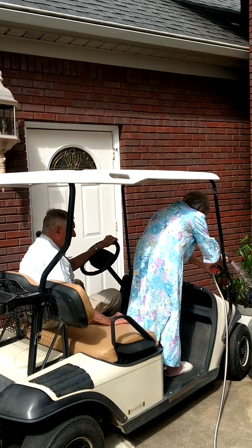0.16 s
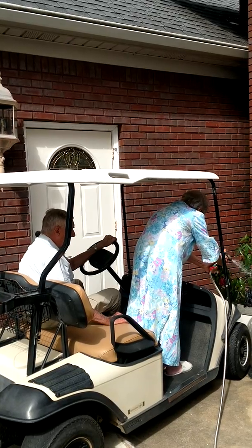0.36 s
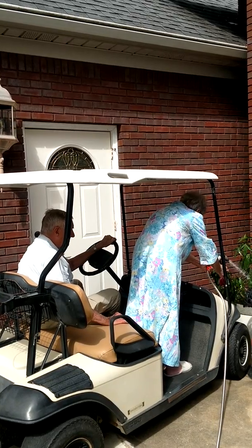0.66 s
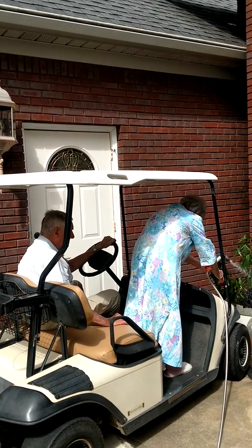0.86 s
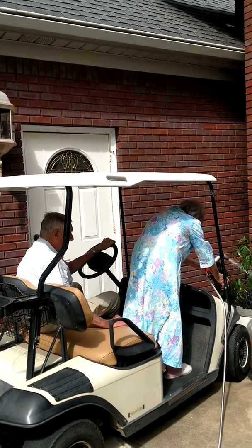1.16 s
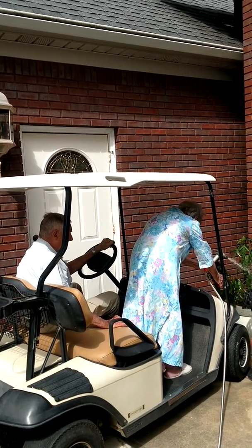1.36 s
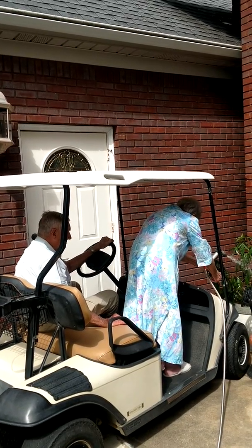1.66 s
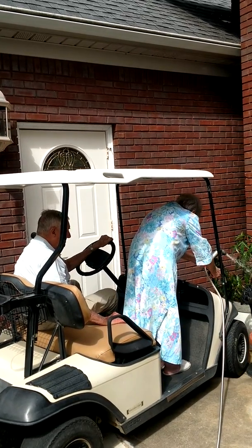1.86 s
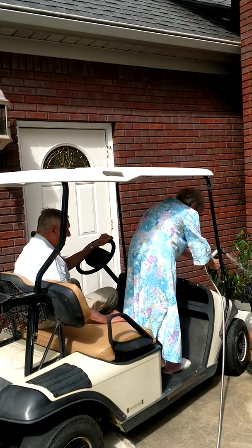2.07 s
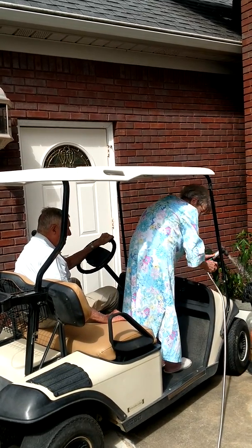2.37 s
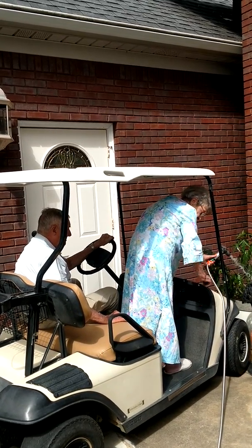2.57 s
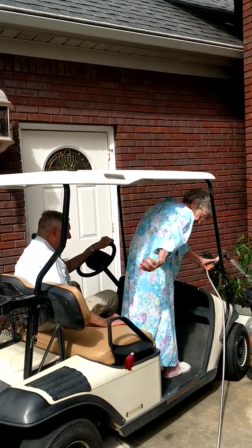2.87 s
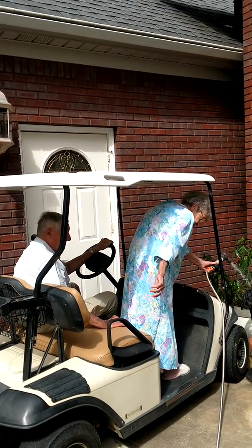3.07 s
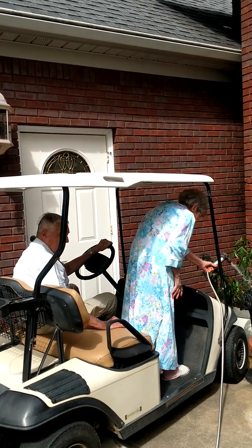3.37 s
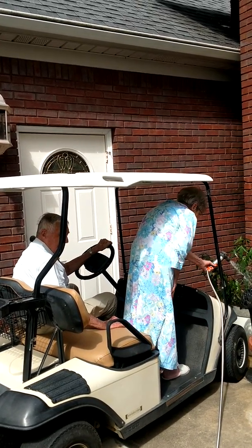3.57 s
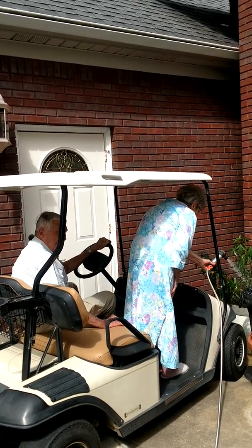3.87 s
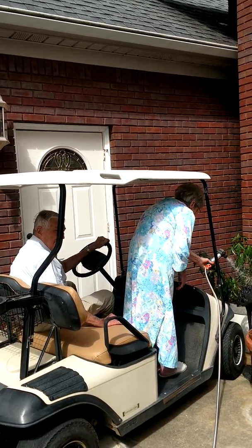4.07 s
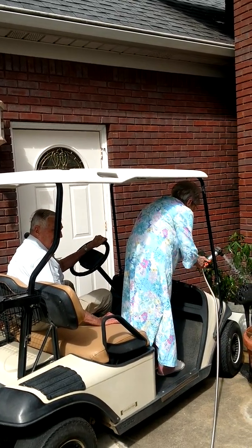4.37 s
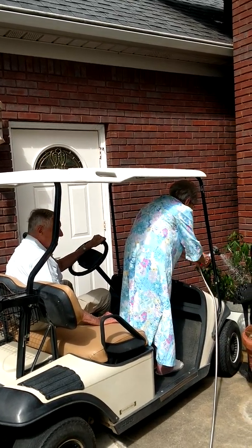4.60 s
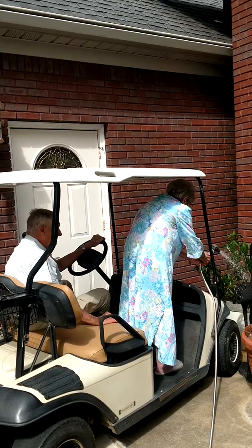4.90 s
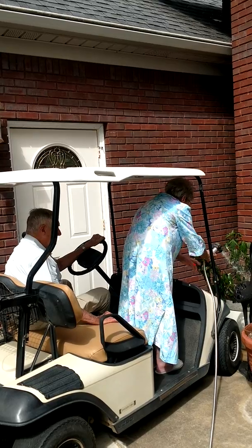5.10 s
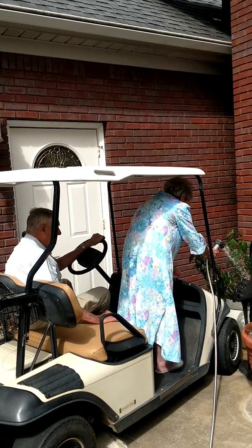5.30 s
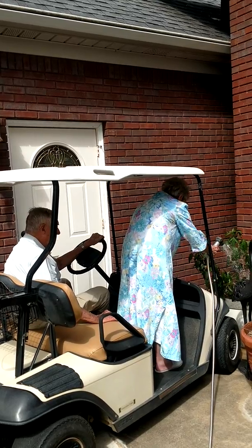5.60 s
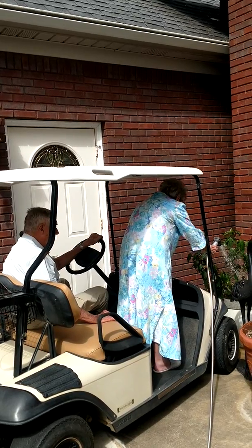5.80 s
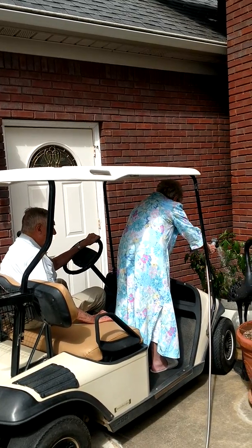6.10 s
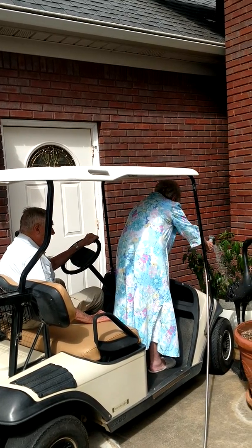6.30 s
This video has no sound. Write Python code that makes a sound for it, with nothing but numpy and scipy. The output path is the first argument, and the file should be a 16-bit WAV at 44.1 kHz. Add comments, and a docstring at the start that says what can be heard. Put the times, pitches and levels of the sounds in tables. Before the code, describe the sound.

A garden hose sprays water onto potted shrubs outdoors for about six and a half seconds, a few metres away and slightly to the right. The nozzle makes a steady, high, grainy hiss, with softer pattering on leaves and splashing in clay pots. A heavy drop slaps a leaf at 0.3 seconds. From 0.4 to 0.8 seconds, wind buffets the left side of the microphone with a cluster of low thumps, then eases. The spray sputters on the leaves in small spurts between 1.5 and 2.2 seconds, and again around 2.8, 4 and 4.9 seconds. Wind thumps return from 4 to 4.6 seconds and from about 5.2 to 5.9. Around 5.7 to 6.1 seconds, the splashing grows fuller and drops ring hollowly inside a deep pot. The hiss continues to the end, with a faint distant rumble beneath it throughout.

```python
"""Hose on potted shrubs in a breeze.

A nozzle a few metres to the right hisses and sputters; drops spatter on leaves and splash into
ringing clay pots. A fitful breeze buffets the left port of a phone, over a distant outdoor rumble.
The phone's stereo stage subtracts a delayed copy of each port from the other."""
import sys
import numpy as np
from scipy import signal
from scipy.fft import rfft, irfft
from scipy.io import wavfile
from scipy.ndimage import uniform_filter1d

SR = 44100
rng = np.random.default_rng(int(sys.argv[2]) if len(sys.argv) > 2 else 0)


def dump_mix(stems):
    """Bounce the given channels to the path in sys.argv[1] as a 16-bit WAV at rate SR."""
    frames = np.atleast_2d(stems).T  # one column per channel
    limited = np.clip(frames, -1, 1)  # hard clip at full scale
    pcm = np.round(limited * 32767).astype(np.int16)
    wavfile.write(sys.argv[1], SR, pcm)


N = 284445
BINS_HZ = np.maximum(np.arange(N // 2 + 1) * SR / N, 1)


def spray():
    """A hand-held nozzle sweeps leaves and pots; air in the hose makes jet and impacts sputter together."""
    # nozzle sweep: time_s, jet_db, leaf_db, pot_db
    sweep = [(0.0, -32, -39.5, -47.5), (0.2, -31, -45, -47), (0.5, -32, -40.5, -45),
             (0.68, -30.5, -44, -46), (1.1, -31.5, -44, -47), (1.45, -30.5, -49, -46),
             (1.55, -31.5, -48, -49.5), (1.66, -28.5, -47.5, -46), (1.72, -31, -45.5, -52),
             (1.86, -30, -51, -49), (1.91, -32, -50, -49.5), (2.0, -29, -48, -47.5),
             (2.05, -32, -52, -43.5), (2.18, -31, -42.5, -44), (2.25, -31.5, -41.5, -47),
             (2.35, -30.5, -41.5, -45.5), (2.6, -31, -43.5, -47.5), (2.83, -33, -39.5, -46),
             (2.9, -31.5, -41, -46), (3.15, -30.5, -40, -47), (3.45, -31, -41, -45), (3.58, -31, -41, -48),
             (3.73, -30.5, -39.5, -44), (4.0, -32, -44.5, -46.5), (4.3, -32, -41, -45),
             (4.95, -30.5, -43.5, -43.5), (5.01, -32.5, -43, -40), (5.08, -32, -50, -45),
             (5.15, -29.5, -46.5, -41), (5.27, -30.5, -41.5, -44.5), (5.35, -31, -42.5, -43),
             (5.47, -32, -39, -44.5), (5.53, -30, -45, -41), (5.6, -31, -43, -44.5),
             (5.67, -30, -44.5, -43), (5.77, -30, -41, -41.5), (5.85, -33, -40.5, -43.5),
             (5.92, -31.5, -44, -39), (6.02, -30, -38.5, -40), (6.13, -31, -39, -47),
             (6.45, -30.5, -38.5, -44)]
    # spurts hitting the leaves: start_s, lift_db
    spurts = [(1.454, 7.5), (1.539, 7), (1.617, 5.5), (1.854, 7.5), (2.003, 3), (2.167, 3.5), (2.819, 6.5),
              (2.989, 3), (4.005, 5.5), (4.218, 4.5), (4.781, 4.5), (4.9, 4.5), (4.968, 3), (6.285, 4.5)]
    # shading by the phone's body: freq_hz, left_minus_right_db
    body_shade = [(500, -2.5), (1100, -3), (1600, -6), (2800, -3.5), (6500, -3.5), (8600, -5), (9700, -6),
                  (10800, -5.2), (12000, -8.3), (14000, -9), (15200, -5)]
    hand_wander_db = (0.2, 0.5, 0.11)  # jet, leaf, pot
    jet_db, leaf_db, pot_db = (c + db * walk(22.125) for c, db in zip(curves(sweep), hand_wander_db))
    sputter = 0.8 * walk(60) + 0.6 * walk(130)
    sputter -= uniform_filter1d(sputter, SR // 14)
    t, fade_s = np.arange(N) / SR, 0.014
    spurt_db = sum(db * (t >= s) * np.exp(-np.abs(t - s) / fade_s) for s, db in spurts)
    shade = spectrum(body_shade)
    return (jet_hiss(jet_db + 0.33 * spurt_db, sputter, shade)
            + leaf_spatter(leaf_db + spurt_db, sputter, shade)
            + pot_splash(pot_db, sputter, shade))


def jet_hiss(level_db, sputter, shade):
    """Water leaves the nozzle with a high, grainy hiss."""
    # jet spectrum: freq_hz, density_db
    colour = [(5000, -16.5), (6200, -12.5), (7500, -8.5), (8600, -1), (9700, -1.5), (10800, -2),
              (12000, 0.5), (12900, 0.5), (14000, -2.5), (15200, -4.5)]
    jet = banded_noise(colour, drops(per_s=6000, share=0.39), shade, likeness=0.032, lag_s=7e-5,
                       common_db=0.45 * sputter, flicker_db=0.56)
    return undb(level_db) * jet


def leaf_spatter(level_db, sputter, shade):
    """Drops patter on leaves; the treble slowly rises and falls."""
    # spatter spectrum: freq_hz, density_db
    colour = [(1500, -4.5), (2200, 1.5), (2800, -3.5), (3400, -1.95), (3900, -1.5), (4600, -6.5),
              (5300, -4.5), (6500, -6.5), (7600, -2), (8600, -59)]
    # shelf above treble_hz: time_s, gain_db
    shelf = [(0.0, -2.5), (0.9, 3.2), (1.8, 6.5), (2.3, 1.3), (3.4, 0.1), (4.2, -0.5), (5.0, 2.5),
             (5.8, -2), (6.45, -1.6)]
    treble_hz = 4400
    spatter = banded_noise(colour, drops(per_s=2500, share=0.18), shade, likeness=0.3, lag_s=5e-5,
                           common_db=0.37 * sputter, flicker_db=0.81)
    treble = filtered(spatter, 1 / (1 + (treble_hz / BINS_HZ) ** 6))
    return undb(level_db) * (spatter + treble * (undb(curves(shelf)[0]) - 1))


def pot_splash(level_db, sputter, shade):
    """Water splashes into the pots; a fuller splash sounds deeper."""
    # splash spectrum: freq_hz, density_db
    colour = [(350, -7.5), (500, -9), (650, -1.7), (860, 1.5), (1100, -3), (1400, -1.5), (2000, -4),
              (2600, -9.5)]
    splash = banded_noise(colour, drops(per_s=900, share=0.23), shade, likeness=0.68, lag_s=1.1e-4,
                          common_db=0.3 * sputter, flicker_db=0.98)
    splash = pot_resonance(splash)
    bass_db = 0.32 * (level_db - np.mean(level_db))
    return undb(level_db) * (splash + lowpass(splash, cutoff_hz=613) * (undb(bass_db) - 1))


def pot_resonance(x):
    """Hollow clay pots lift narrow bands of the noise that excites them."""
    # pot modes: freq_hz, width_hz, lift_db
    modes = [(235.3, 8.1, 10), (295.5, 6.6, 9.5), (404, 7.3, 3), (554, 31, 4), (1090, 28, 1),
             (1240, 15, 1.5)]
    return filtered(x, 1 + sum((undb(db) - 1) * resonance(hz, width) for hz, width, db in modes))


def leaf_slaps():
    """Heavy drops hit a leaf with a ragged splat."""
    # slaps: time_s, level_db, pitch_hz, length_ms
    slaps = [(.040, -37, 2100, 5.0), (.300, -31, 1750, 2.8), (.313, -42, 1250, 3.0), (5.531, -40, 830, 9)]
    return wavelets(slaps, glide=0.11, rise=3.0) * (1 + 0.2 * walk(900)) * port_gains(-3, 0)


def deep_pot():
    """Drops falling inside a deep pot ring its hollow."""
    # hollow's modes: freq_hz, width_hz, gain_db
    modes = [(543, 70, -2.5), (655, 48, -0.5), (1100, 36, 0), (1270, 28, 2)]
    # ring as the jet falls inside: time_s, level_db
    inside = [(0.0, -63.5), (4.9, -62), (5.15, -55.5), (5.4, -60), (5.7, -50), (5.78, -51), (5.85, -50),
              (5.93, -42), (6.03, -42), (6.12, -56), (6.45, -60)]
    hollow = sum(undb(db) * resonance(hz, width) for hz, width, db in modes)
    ring = unit_rms(filtered(drops(per_s=300, share=0.52)[0], hollow))
    return ring * undb(curves(inside)[0] + 2.44 * walk(20)) * port_gains(-3, 0)


def wind():
    """Eddies rumble and buffet on the left port; the right is sheltered."""
    # breeze strength: time_s, level_db
    gusts = [(0.0, -26.5), (0.14, -53), (0.3, -46), (0.37, -37), (0.41, -36), (0.55, -31), (0.66, -35.5),
             (0.8, -44.5), (0.9, -60), (1.15, -52), (1.55, -62), (1.85, -73), (2.25, -41), (2.45, -53),
             (2.7, -50), (3.33, -66), (3.45, -51), (3.75, -44), (3.93, -64), (4.1, -34), (4.15, -48),
             (4.26, -56), (4.45, -46), (4.92, -64), (5.26, -41), (5.5, -48.5), (5.63, -44), (5.67, -32),
             (5.76, -35), (5.92, -41), (6.1, -76), (6.25, -44.5), (6.45, -60)]
    # eddy spectrum: freq_hz, density_db
    colour = [(25, -47), (50, 1), (90, -9), (140, -4), (220, -6), (320, -28), (450, -28.5), (700, -49)]
    gust_db, = curves(gusts)
    eddies = filtered(rng.standard_normal((2, N)), spectrum(colour))
    dull = unit_rms(lowpass(eddies, cutoff_hz=150))
    brightness = np.clip((gust_db + 52) / 25, 0, 1)  # faster air sheds smaller eddies
    rumble = (1 - brightness) * dull + brightness * unit_rms(eddies)
    rumble *= undb(gust_db + 3.5 * walk(35))
    return rumble * port_gains(2.5, -16) + buffets(gust_db) * port_gains(0.6, -30)


def buffets(gust_db):
    """Puffs of air thump the port; strong ones steepen and carry overtones."""
    # strong buffets: time_s, level_db, pitch_hz, length_ms
    strong = [(0.017, -23, 137, 15), (0.394, -15.5, 113, 18), (0.441, -17.5, 112, 11),
              (0.469, -14.5, 104, 12), (0.496, -14.5, 170, 11), (0.52, -11.5, 108, 23),
              (0.54, -13, 120, 11), (0.561, -16, 139, 7.7), (0.575, -10, 148, 8.5), (0.592, -19, 190, 7),
              (0.635, -23, 100, 12), (0.655, -15, 93.5, 9.6), (0.71, -24, 109, 17), (0.735, -23, 106, 8.3),
              (0.774, -24, 80, 20), (0.807, -21.5, 98, 14), (2.25, -28, 96, 39), (3.478, -25, 118, 9.2),
              (4.017, -29, 130, 8), (4.046, -26, 140, 9.9), (4.065, -26, 78, 13), (4.105, -15, 99, 13),
              (4.41, -21, 136, 6.5), (4.442, -18, 124, 7.8), (4.613, -19.5, 108, 16),
              (5.192, -17, 109, 7.7), (5.332, -22, 107, 8.5), (5.623, -26, 109, 8.8),
              (5.659, -24.5, 260, 5.5), (5.669, -15.5, 88, 13), (5.701, -16, 131, 10),
              (5.723, -19.5, 101, 11), (5.774, -20, 110, 18), (5.82, -24, 95, 10), (5.837, -19.5, 100, 10),
              (5.911, -28, 95, 16), (6.223, -27, 114, 7.1)]
    puffs = wavelets(np.vstack([strong, weak_buffets(gust_db)]), glide=0.1, rise=3.2)
    return puffs + 2.0 * filtered(puffs ** 2, BINS_HZ > 150) + 3.1 * filtered(puffs ** 3, BINS_HZ > 330)


def weak_buffets(gust_db, count=60, cap_db=-23, length_ms=30):
    """Rows of weak buffets at random times, following the breeze's strength."""
    time_s = rng.random(count) * (N - 1) / SR
    level_scatter, pitch_scatter = rng.standard_normal((count, 2)).T
    level_db = np.minimum(gust_db[(time_s * SR).astype(int)] + 12.5 + 2.5 * level_scatter, cap_db)
    pitch_hz = 95.6 * np.exp(0.13 * pitch_scatter)
    return np.transpose([time_s, level_db, pitch_hz, np.full(count, length_ms)])


def distant_rumble(swell_db):
    """Outdoor rumble sets the lowest pot modes humming."""
    # rumble spectrum: freq_hz, density_db
    colour = [(40, -4), (100, 5), (200, -7), (300, -12.5), (450, -16.5), (700, -30)]
    rumble = banded_noise(colour, rng.standard_normal((2, N)), shade=0.96, likeness=1.0, lag_s=7e-5,
                          common_db=swell_db, flicker_db=0.81)
    return undb(-45) * pot_resonance(rumble)


def drops(per_s, share):
    """Hiss with a share of its power in single uneven impacts; one stream a port."""
    hits = (rng.random((2, N)) < per_s / SR) * rng.standard_normal((2, N))
    return np.sqrt(share) * unit_rms(hits) + np.sqrt(1 - share) * rng.standard_normal((2, N))


def banded_noise(colour, streams, shade, likeness, lag_s, common_db, flicker_db):
    """Coloured noise in flickering third octaves; left port shaded and late, right port at rms 1."""
    own, right = streams
    left = likeness * right + np.sqrt(1 - likeness ** 2) * own
    ports = rfft([left, right]) * spectrum(colour)
    ports[0] *= shade * delay(lag_s)
    out, bin_band = 0, 3 * np.log2(BINS_HZ)
    for band in np.arange(np.floor(3 * np.log2(colour[0][0])), 3 * np.log2(colour[-1][0]) + 1):
        skirt = np.cos(np.pi / 2 * np.clip(bin_band - band, -1, 1)) ** 2
        out = out + irfft(ports * skirt, N) * undb(common_db + flicker_db * walk(24.084))
    return out / np.sqrt(np.mean(out[1] ** 2))


def wavelets(rows, glide, rise):
    """Short tones of random phase: quick rise, slower fade, falling pitch."""
    out = np.zeros(N)
    for (time_s, level_db, pitch_hz, length_ms), phase in zip(rows, rng.random(len(rows))):
        first, last = int((time_s - length_ms / 400) * SR), int((time_s + length_ms / 300) * SR)
        i = np.arange(max(first, 0), min(last, N))
        age_s = i / SR - time_s
        progress = age_s / (length_ms / 1000)
        envelope = np.exp(-np.where(progress < 0, rise, 1.6) * progress ** 2)
        cycles = pitch_hz * age_s * (1 - glide * progress) + phase
        out[i] += undb(level_db) * envelope * np.sin(2 * np.pi * cycles)
    return out


def walk(rate_hz):
    """Random steps, smoothed twice."""
    hold = int(SR / rate_hz)
    steps = np.repeat(rng.standard_normal(N // hold + 1), hold)
    return 2.1 * uniform_filter1d(uniform_filter1d(steps, hold), hold)[:N]


def curves(table):
    """Columns of a timed table at every sample, corners rounded."""
    time_s, *columns = np.transpose(table)
    return [uniform_filter1d(np.interp(np.arange(N) / SR, time_s, c), SR // 25) for c in columns]


def spectrum(table):
    """Gain per bin from rows of freq_hz, gain_db."""
    freq_hz, gain_db = np.transpose(table)
    return undb(np.interp(np.log(BINS_HZ), np.log(freq_hz), gain_db))


def resonance(freq_hz, width_hz):
    return 1 / (1 + 2j * (BINS_HZ - freq_hz) / width_hz)


def delay(lag_s):
    return np.exp(-2j * np.pi * BINS_HZ * lag_s)


def filtered(x, response):
    return irfft(rfft(x) * response, N)


def lowpass(x, cutoff_hz):
    return filtered(x, 1 / (1 + (BINS_HZ / cutoff_hz) ** 4))


def undb(db):
    return 10 ** (np.asarray(db) / 20)


def unit_rms(x):
    return x / np.sqrt(np.mean(x ** 2))


def port_gains(left_db, right_db):
    return undb([[left_db], [right_db]])


def scene():
    """Pressure at the left and right microphone ports."""
    swell_db = walk(1.5)
    return spray() + leaf_slaps() + deep_pot() + wind() + distant_rumble(swell_db)


def record(dry):
    """Phone: bass roll-off, delayed opposite port subtracted (less in the treble), steep top cut."""
    # share of the opposite port: freq_hz, gain_db
    crossfeed = [(60, -1.1), (400, -1.2), (900, 0), (4700, 0), (5400, -3), (6100, 0), (6800, 0), (7500, -4),
                 (8600, -9.5), (9700, -15), (10800, -22), (12900, -19), (15000, -16)]
    low_hz, top_hz = 40, 15710
    ports = rfft(dry) / np.sqrt(1 + (low_hz / BINS_HZ) ** 4)
    cross = spectrum(crossfeed) * delay(lag_s=4.65e-4)
    wide = irfft(ports - cross * ports[::-1], N)
    return signal.sosfilt(signal.ellip(12, 0.2, 80, top_hz, fs=SR, output="sos"), wide)


dry = scene()
out = record(dry)
dump_mix(out)
```